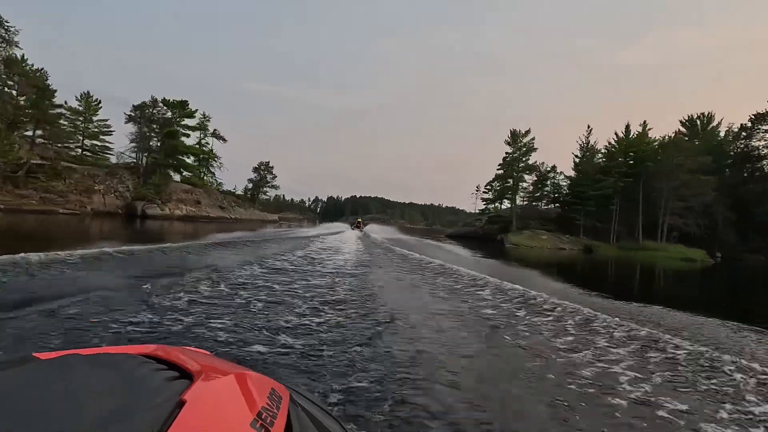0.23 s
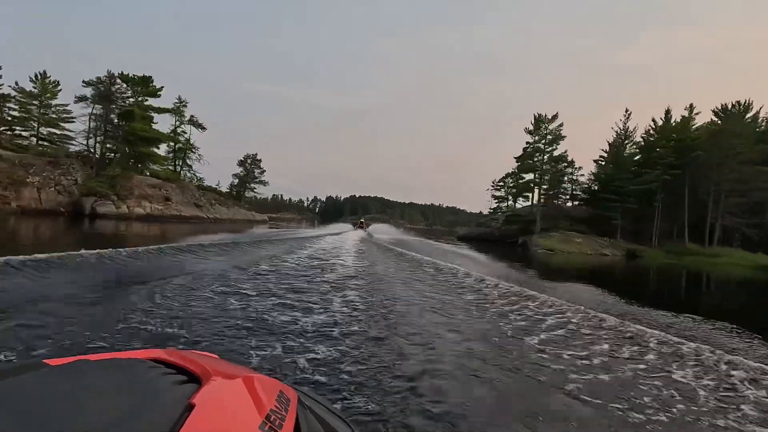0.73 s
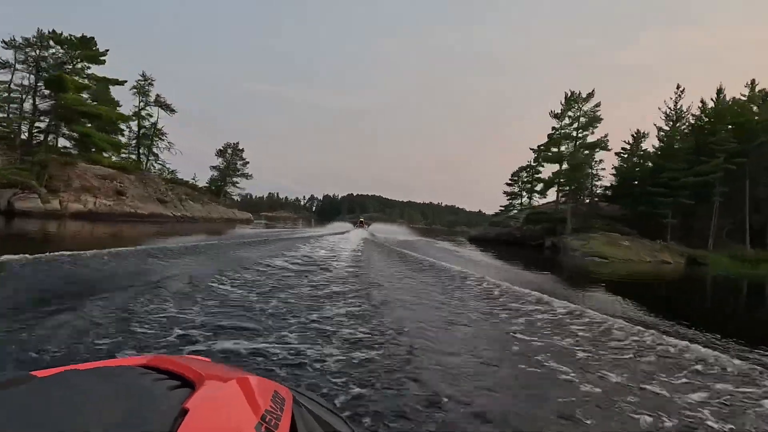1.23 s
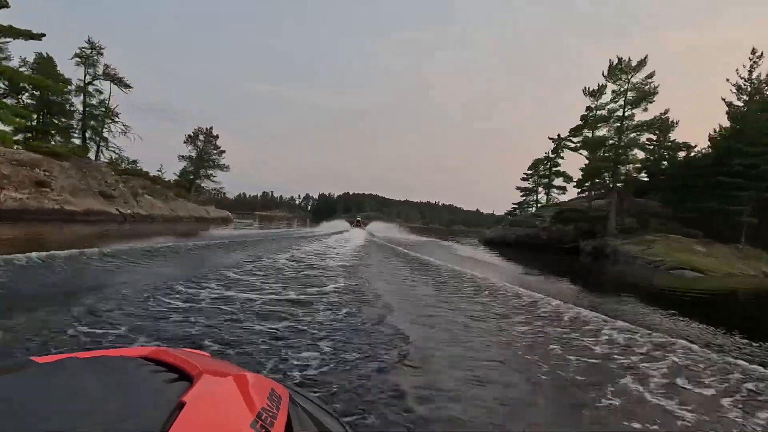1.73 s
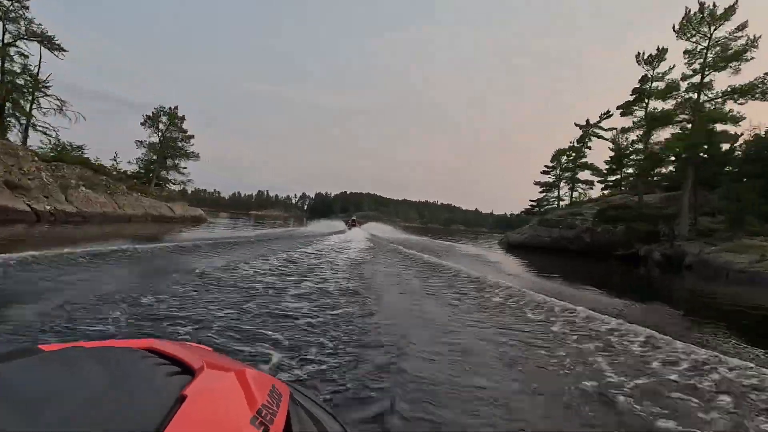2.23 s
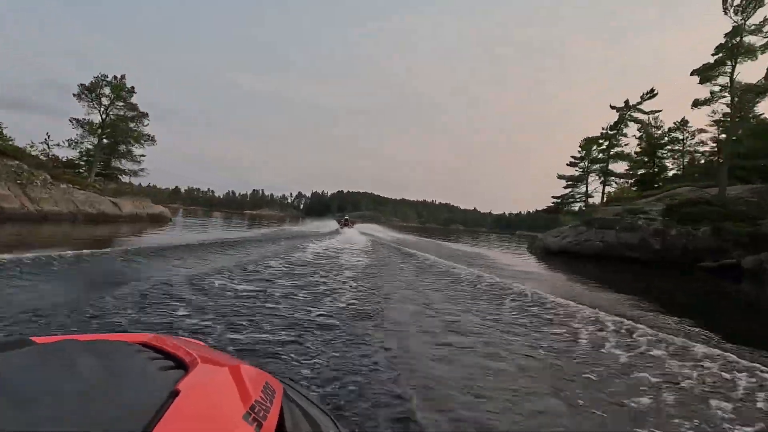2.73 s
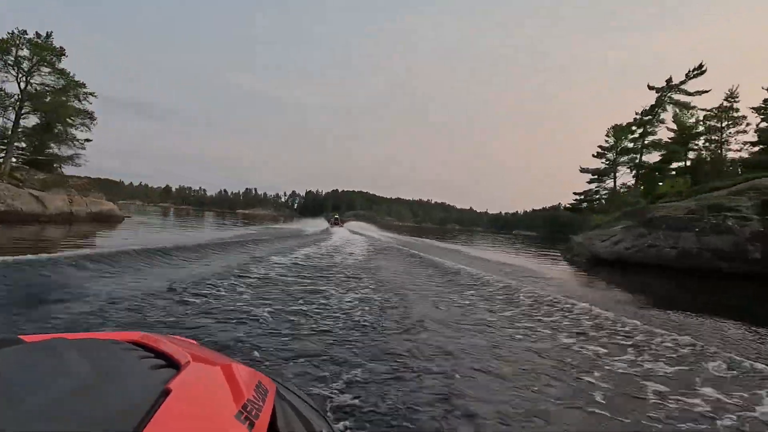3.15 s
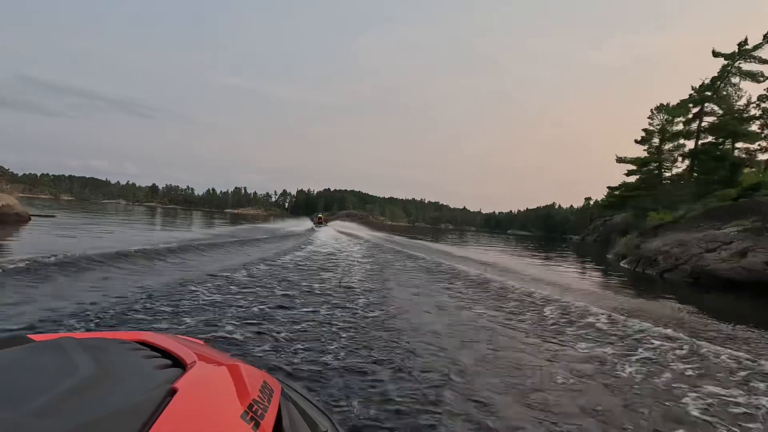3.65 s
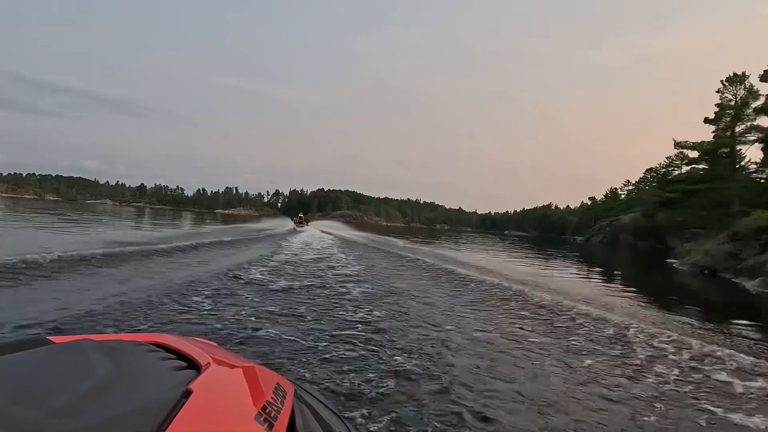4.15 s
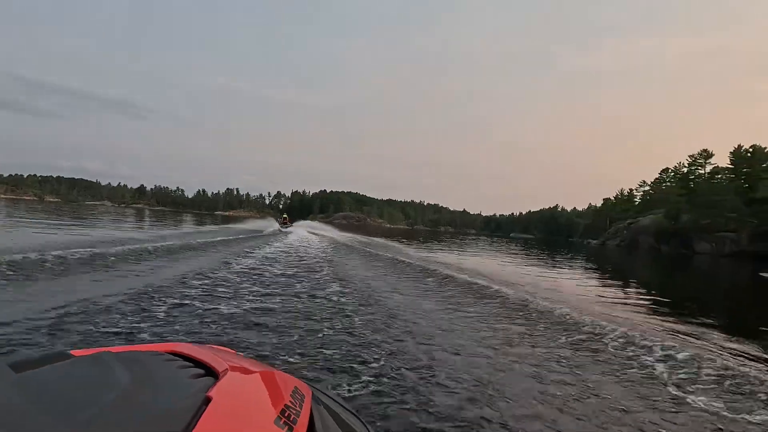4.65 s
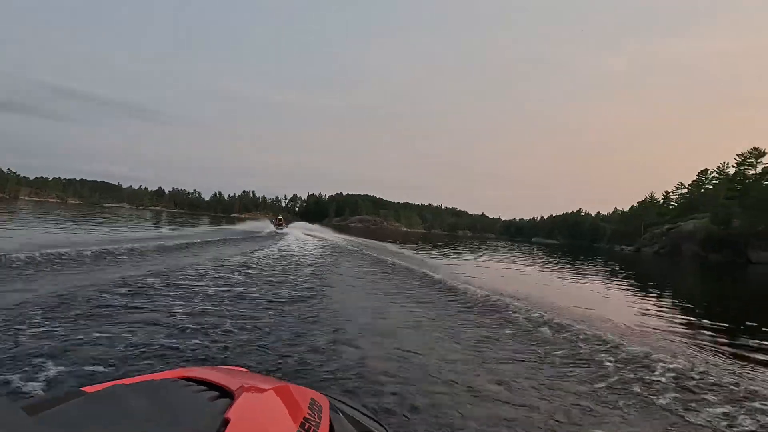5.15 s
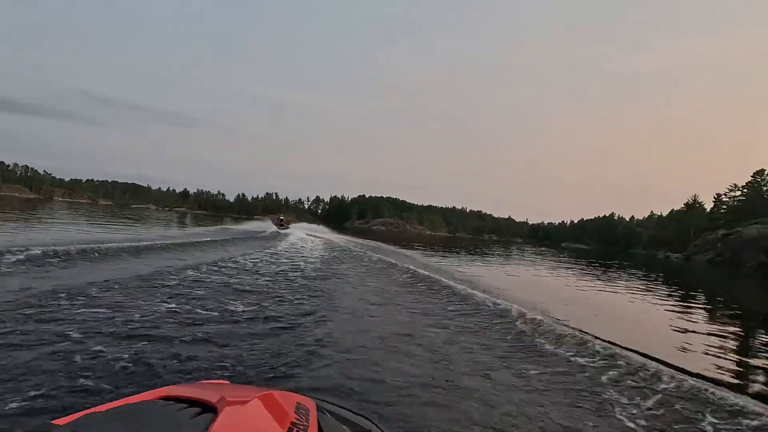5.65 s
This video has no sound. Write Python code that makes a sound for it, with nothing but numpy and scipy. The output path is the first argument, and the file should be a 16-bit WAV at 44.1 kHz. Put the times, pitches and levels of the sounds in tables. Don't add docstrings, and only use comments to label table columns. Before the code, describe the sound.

A personal watercraft engine hums loudly at cruising speed over a lake, sagging twice and recovering, amid rushing wake, slapping water and buffeting wind.

```python
import sys
import numpy as np
from scipy import signal
from scipy.fft import rfft, irfft
from scipy.io import wavfile
from scipy.ndimage import uniform_filter1d, minimum_filter1d

SR = 44100
rng = np.random.default_rng(int(sys.argv[2]) if len(sys.argv) > 2 else 0)


def output_pcm(signal):
    pcm = np.clip(np.atleast_2d(signal).T, -1, 1) * 32767
    wavfile.write(sys.argv[1], SR, np.round(pcm).astype(np.int16))


def how_loud(loudness_db):
    steps = np.asarray(loudness_db, float) / 20
    return 10 ** steps


N = 260190

# (time [s], engine cycle = half the shaft speed [Hz], throttle [0-1])
ENGINE = [(0.0, 43.33, 0.83), (0.45, 43.17, 0.72), (0.9, 42.53, 0.72), (1.5, 43.61, 0.39),
          (1.85, 42.28, 0.85), (2.05, 40.34, 0.67), (2.25, 38.61, 0.3), (2.5, 39.2, 0.3),
          (2.89, 40.64, 0.82), (3.75, 41.84, 0.87), (3.96, 41.2, 0.8), (4.16, 36.34, 0),
          (4.42, 36.47, 0.32), (4.88, 39.21, 0.45), (5.16, 37.72, 0.99), (5.54, 38.51, 0.83),
          (5.78, 41.55, 0.42), (5.9, 41.7, 0.7)]
# (multiple, level at full throttle [dB], loss when shut [dB],
# panel centre [Hz], panel width [Hz], panel lift [dB])
LEADS = [
    (3, -24.5, 2.5, 118, 8.4, 2.5),
    (6, -29.5, 3.5, 236.2, 31.3, 12.5),
    (8, -19.5, 13, 332, 17, 3),
    (12, -51.5, -12.5, 448.4, 26.1, 19),
]
# (multiple, level [dB])
STEADY_ORDERS = [(2, -36), (4, -24.5), (5, -38), (7, -35), (10, -38.5), (11, -43), (13, -54), (14, -46),
                 (15, -49.5), (16, -47), (17, -48), (19, -51.5), (22, -53), (24, -65.5), (25, -65.5)]
# (centre [Hz], width [Hz], lift [dB])
HULL_PANELS = [(325.7, 5.6, 0.5), (474, 29, 5.5), (712, 70, 5)]
# (time [s], level around the mean [dB])
CHURN = [(0.35, 0.96), (0.58, -1), (0.77, 2), (0.92, -1), (1.26, 1), (1.6, -1.5), (1.78, 1.5), (2.08, -0.5),
         (2.32, 0.5), (2.56, 0), (3.7, -1.5), (3.86, 1), (4.0, -2), (4.3, 2.5), (4.47, 1.5), (4.6, 3.5),
         (5.08, 0), (5.9, 1)]
# (frequency [Hz], level per Hz [dB])
DRUM_COLOUR = [(40, -21), (100, -1.5), (150, -2), (300, 2.5), (400, -6.5), (480, -12.5), (600, -36.5),
               (900, -130)]
# (frequency [Hz], level per Hz [dB])
ROAR_COLOUR = [(250, -29.5), (400, 8), (460, 3.5), (540, -2), (706, -1.5), (900, -9.5), (1250, -11.5),
               (2000, -27), (3500, -53.5), (7000, -120)]
# (frequency [Hz], level per Hz [dB])
SPRAY_COLOUR = [(880, -25), (1500, -2.5), (1930, -4), (2480, -10.5), (2750, -6.5), (2970, -9.5),
                (4230, -16), (4600, -16.5), (6150, -23.5), (8530, -26), (10000, -32), (14000, -55)]
# (time [s], peak level [dB], thud over it [dB])
SLAPS = [(0.2194, -30.5, 4.5), (0.339, -34, 11.5), (0.496, -27, 2), (0.509, -29.5, 9.5),
         (0.8393, -31, 10.5), (1.1684, -30, 2.5), (1.716, -40.5, 3), (2.2694, -35.5, 19), (2.471, -40.5, 2),
         (3.1894, -33, 7), (3.7489, -41.5, 3.5), (4.2913, -37, -3), (4.5024, -34, -1), (5.2597, -31, -1.5),
         (5.7392, -37, 12.5)]
# (frequency [Hz], level per Hz [dB])
WIND_COLOUR = [(10, -10), (25, -3.5), (45, 5), (80, 1), (130, -2), (250, -7.5), (500, -27), (1000, -66.5),
               (2000, -130)]
# (time of peak [s], rise [dB], length [s])
GUSTS = [(0.05, 7.7, 0.19), (0.361, 3.6, .07), (0.58, 5, 0.26), (0.871, 7.3, 0.089), (1.07, 8.1, 0.065),
         (1.18, 9.7, 0.064), (1.44, 6, 0.17), (1.99, 7, 0.091), (2.181, 8, 0.11), (2.47, 9.1, 0.054),
         (2.62, 5.7, 0.28), (2.98, 8.7, 0.17), (3.53, 11, 0.13), (3.83, 2.5, 0.036), (4.181, 4.1, 0.054),
         (4.46, 5.8, 0.2), (4.681, 7, .05), (4.87, 4.1, 0.093), (5.48, 2.5, 0.056), (5.79, 8, 0.056)]

DRUM_DB, ROAR_DB, SPRAY_DB, WIND_DB = -23, -33.5, -47.9, -28.5
ROAR_SHARE, SPRAY_SHARE = 0.88, 0.95
BANK_DB, BANK_GONE_S = 2.5, 3.2
PLANING_DB = -0.5
GUST_RISE = 0.55


def engine(cycles, cycle_hz, levels_db):
    eased_db = levels_db[3]
    rough_db = np.interp(eased_db, [-38, -30], [0.5, 2.2])
    rough_db += np.interp(cycle_hz, [42, 43], [0, 1.5])
    out = np.zeros(N)
    for k, db in zip((3, 6, 8), levels_db):
        out += order(k, cycles, db, rough_db)
    out += order(12, cycles, eased_db - 2, 3.5)

    centre_hz, width_hz = HULL_PANELS[0][:2]
    ninth_db = eased_db - 1.5 + 8.5 * panel(9 * cycle_hz, centre_hz, width_hz)
    out += order(9, cycles, ninth_db, 1.8)

    for k, db in STEADY_ORDERS:
        lift_db = sum(lift * panel(k * cycle_hz, f, width) for f, width, lift in HULL_PANELS)
        out += order(k, cycles, db + lift_db, 1.1)
    return out


def order(k, cycles, db, waver_db):
    late = 2 * np.pi * rng.random() + 0.35 * drift(1.5) + 0.22 * drift(14)
    level = how_loud(db + waver_db * drift(6.5))
    return np.sqrt(2) * level * np.cos(2 * np.pi * k * cycles + late)


def lead_levels(cycle_hz, throttle):
    return [db - shut_db * (1 - throttle) + lift_db * panel(k * cycle_hz, f, width)
            for k, db, shut_db, f, width, lift_db in LEADS]


def panel(hz, centre_hz, width_hz):
    return 1 / (1 + (2 * (hz - centre_hz) / width_hz) ** 2)


def wake(cycles, throttle):
    roar_db, spray_db = water_levels(throttle)
    flicker = how_loud(0.75 * drift(38))
    turn = 2 * np.pi * cycles
    chop = 1 + 0.059 * np.cos(turn) + 0.056 * np.cos(3 * turn) + 0.077 * np.cos(4 * turn)
    drum = evened(noise(DRUM_COLOUR, size=2048, patchy_db=1.86))
    roar = noise(ROAR_COLOUR, size=1024, patchy_db=0.4) * flicker
    spray = noise(SPRAY_COLOUR, size=512, patchy_db=0.9) * flicker * chop
    roar /= np.std(band(roar, 500, 1500))
    spray /= np.std(band(spray, 2000, 9000))
    return how_loud(DRUM_DB) * drum + how_loud(roar_db) * roar + how_loud(spray_db) * spray


def water_levels(throttle):
    churn_db, = curves(CHURN)
    bank_db = BANK_DB * np.clip(1 - np.arange(N) / SR / BANK_GONE_S, 0, 1)
    roar_db = ROAR_DB + ROAR_SHARE * churn_db + bank_db + PLANING_DB * (throttle - 0.5)
    return roar_db, SPRAY_DB + SPRAY_SHARE * churn_db


def slaps():
    out = np.zeros(N)
    t = np.arange(3000) / SR
    shape = np.minimum(t / 0.002, 1) * how_loud(-60 * t / 0.05)
    for s, db, thud_db in SLAPS:
        spatter = evened(band(rng.standard_normal(len(t)), 900, 2400))
        spatter += 0.2 * evened(band(rng.standard_normal(len(t)), 2400, 5200))
        thud = evened(band(rng.standard_normal(len(t)), 490, 1050))
        splash = how_loud(db - 6) * (spatter + how_loud(thud_db) * thud) * shape
        part = out[round(s * SR):][:len(t)]
        part += splash[:len(part)]
    return out


def wind():
    gusts = noise(WIND_COLOUR, size=2048, patchy_db=2.26) * how_loud(drift(9.4))
    return how_loud(gustiness()) * gusts / np.std(band(gusts, 20, 100))


def gustiness():
    t = np.arange(N) / SR
    level_db = np.full(N, float(WIND_DB))
    for s, db, length in GUSTS:
        side_s = length * np.where(t < s, GUST_RISE, 1)
        level_db += db * np.exp(-((t - s) / side_s) ** 2)
    return level_db


def noise(spectrum, size, patchy_db):
    hz = np.fft.rfftfreq(size, 1 / SR)
    a, b, patches = rng.standard_normal((4 * N // size + 5, len(hz), 3)).T
    patches = uniform_filter1d(patches, size=9, axis=0)
    patches = evened(uniform_filter1d(patches, size=9, axis=1))
    z = (a + 1j * b) * how_loud(read(spectrum, hz)[:, None] + patchy_db * patches)
    return signal.istft(z, nperseg=size, noverlap=3 * size // 4)[1][:N]


def drift(top_hz):
    t = np.arange(0, N + 64, 64) / SR
    z = rfft(rng.standard_normal(len(t)))
    slow = irfft(z / (1 + (np.fft.rfftfreq(len(t), t[1]) / top_hz) ** 4), len(t))
    return np.interp(np.arange(N) / SR, t, evened(slow))


def band(x, lo_hz, hi_hz):
    return signal.sosfilt(signal.butter(4, [lo_hz, hi_hz], "bandpass", fs=SR, output="sos"), x)


def evened(x):
    return x / np.sqrt(np.mean(x ** 2) + 1e-20)


def read(points, hz):
    f, value = np.transpose(points)
    return np.interp(np.log(hz + 1), np.log(f + 1), value)


def curves(rows):
    s, *columns = np.transpose(rows)
    return [np.interp(np.arange(N) / SR, s, c) for c in columns]


def scene():
    cycle_hz, throttle = curves(ENGINE)
    throttle = np.clip(throttle, 0, 1)
    cycles = np.cumsum(cycle_hz) / SR
    hum = engine(cycles, cycle_hz, lead_levels(cycle_hz, throttle))
    return (hum + wake(cycles, throttle) + slaps() + wind())[None]


def top_cut(x):
    return signal.sosfilt(signal.butter(12, 14440, fs=SR, output="sos"), x)


def record(dry):
    room = np.minimum(1, 0.475 / (abs(dry) + 1e-9))
    room = minimum_filter1d(room, size=601, axis=1)
    for _ in range(3):
        room = uniform_filter1d(room, size=201, axis=1)
    limited = how_loud(0.45) * dry * room
    bent = limited + 0.12 * (limited ** 2 - np.mean(limited ** 2))
    return top_cut(bent)


dry = scene()
out = record(dry)
output_pcm(out)
```